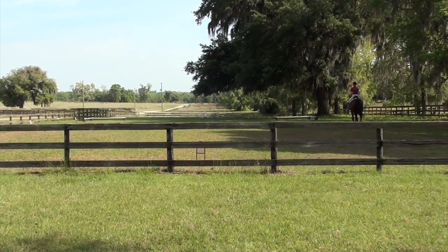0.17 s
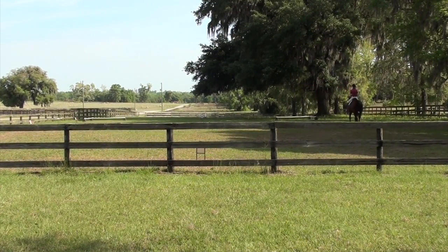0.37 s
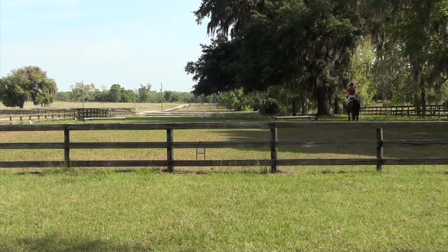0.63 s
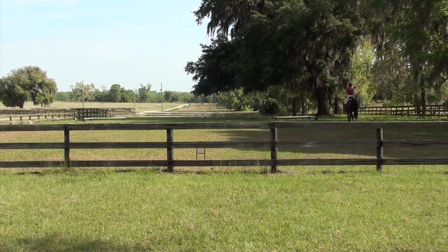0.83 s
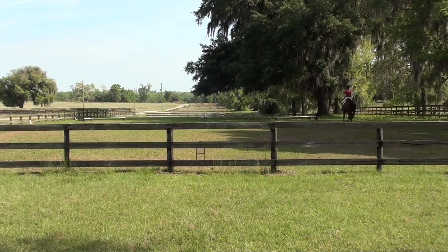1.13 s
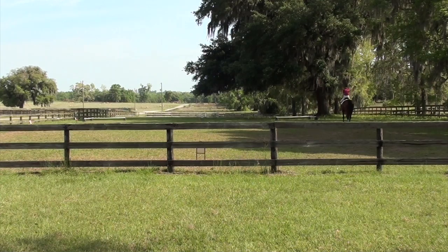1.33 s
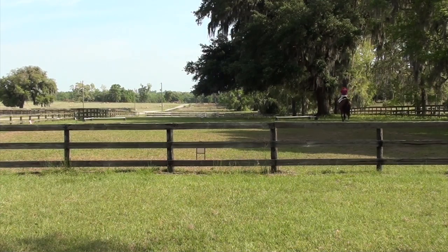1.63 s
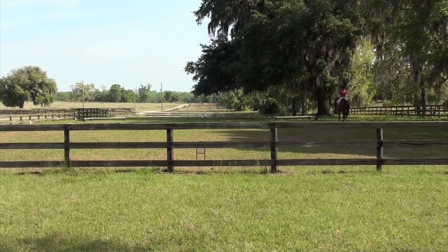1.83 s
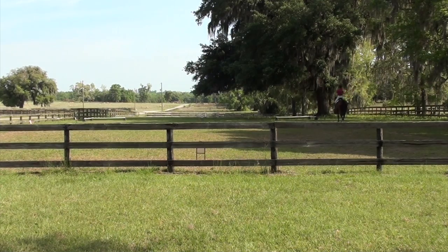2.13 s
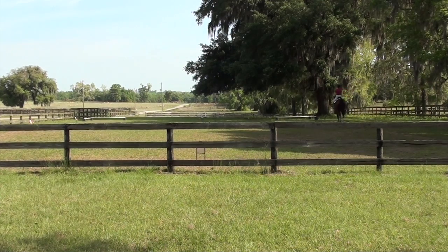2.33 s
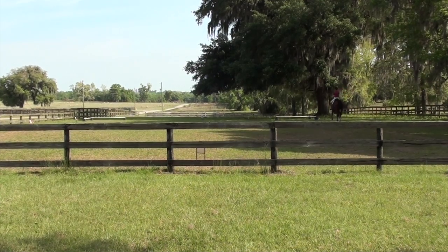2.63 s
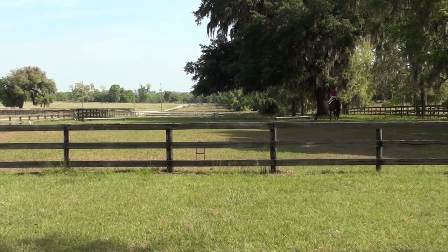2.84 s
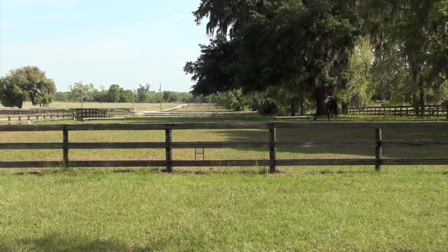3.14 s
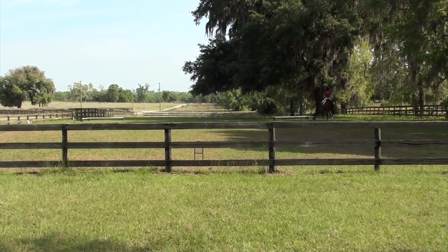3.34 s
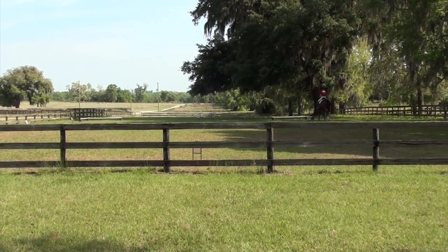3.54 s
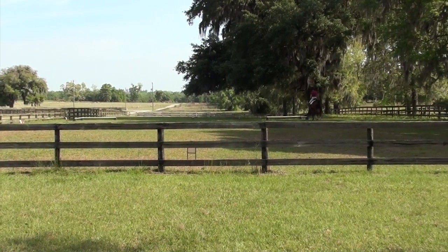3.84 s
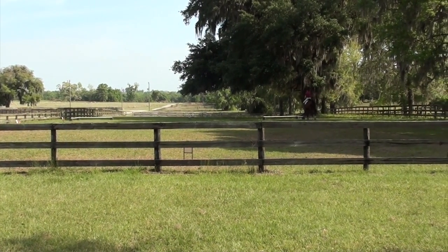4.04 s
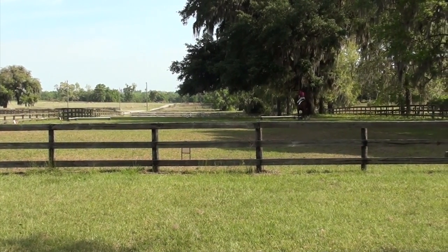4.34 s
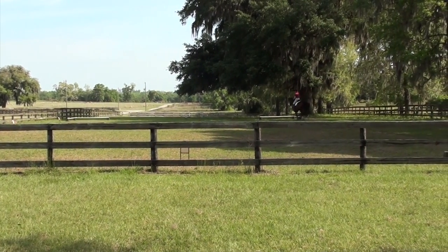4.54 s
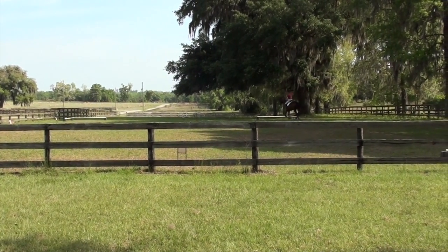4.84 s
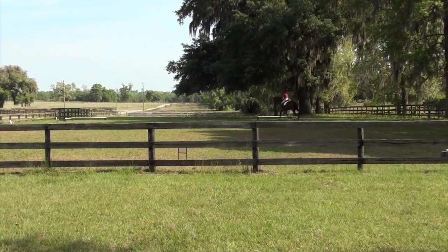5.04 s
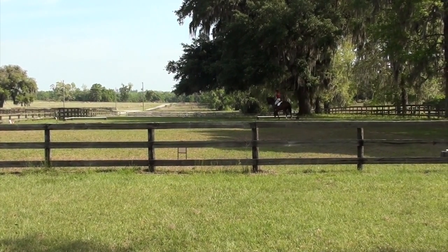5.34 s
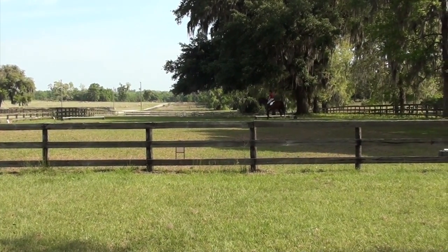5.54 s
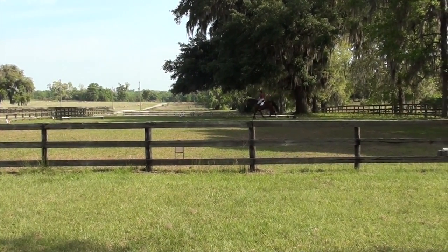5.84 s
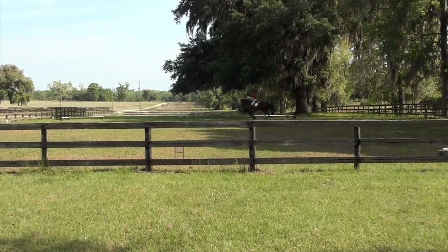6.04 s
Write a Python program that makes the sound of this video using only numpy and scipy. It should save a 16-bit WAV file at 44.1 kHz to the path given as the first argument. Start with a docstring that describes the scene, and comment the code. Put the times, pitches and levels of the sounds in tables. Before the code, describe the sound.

A warm pasture heard from a stationary stereo microphone. Throughout, crickets make thin, very high trills of rapid gliding chirps: two run almost continuously, one joining softly at about 0.4 s and growing, while others pulse in phrases of a quarter to three quarters of a second, over a hazy far chorus. Beneath lie a soft road drone, low rumble, tyre hiss, faint hum and air hiss, the traffic swelling slightly late. At 0.6 s a hollow wooden knock rattles in a quick cluster and echoes. From 1.07 to 1.5 s come dry close rustles, with small ticks at 1.17, 1.29 (sharpest) and 1.42 s. Faint bird whistles come at 1.8 and 2.96 s. Tiny brushes at 2.0-2.1 s precede the loudest knock at 2.28 s, its echo lingering among trees. A bright tick snaps at 3.5 s. Near 6.05 s a brief bird note precedes a weaker knock at 6.16 s, cut off by the end.

```python
"""Six ground crickets trill in a warm daytime pasture over a far blur of others; each wing stroke is one
short gliding whistle. Hollow knocks, rings of damped sines, come from the right and echo off trees and
buildings. Small ringing ticks and noisy rustles sound close to the microphone, and a far bird whistles
sliding notes. A distant road drones in shaped noise with a faint hum, over air and microphone hiss."""
import sys
import numpy as np
from scipy import signal
from scipy.fft import rfft, irfft, next_fast_len
from scipy.io import wavfile
from scipy.ndimage import uniform_filter1d

SR = 44100
rng = np.random.default_rng(int(sys.argv[2]) if len(sys.argv) > 2 else 0)


def pcm_store(signal):
    """Save signal as 16-bit PCM."""
    levels = np.round(np.clip(np.atleast_2d(signal), -1, 1) * 32767)
    wavfile.write(sys.argv[1], SR, levels.astype(np.int16).T)


N = 272979


def amp(db):
    """Gain of a level in dB."""
    return 10 ** (np.asarray(db) / 20)


def unit(x):
    """Scaled to rms 1."""
    return x / np.sqrt(np.mean(x ** 2) + 1e-20)


def along(points, hz):
    """Values at hz, read between (Hz, value) points on a log frequency axis."""
    point_hz, value = np.transpose(points)
    return np.interp(np.log(hz + 1), np.log(point_hz + 1), value)


def curves(rows):
    """One value per sample for each column after the time."""
    s, *columns = np.transpose(rows)
    return [np.interp(np.arange(N) / SR, s, column) for column in columns]


def pan(left_db):
    """Gains of the two channels; left_db is left over right."""
    return amp([[left_db / 2], [-left_db / 2]])


def rush(spectrum, patchy_db, left_db):
    """Shaped stereo noise, rms 1 before panning, whose gain wanders in patches of time and frequency."""
    # Each row: frequency in Hz, likeness of left and right (1 is identical).
    alike = [(60, 1), (150, .975), (950, 0.87), (2400, 0.54), (4500, 0.76), (6000, 0.67), (8000, 0.81),
             (10000, 1)]
    hz, t, z = signal.stft(rng.standard_normal((2, N + 512)), SR, nperseg=1024)
    field = uniform_filter1d(rng.standard_normal(z.shape[1:]), size=9, axis=0)
    field = uniform_filter1d(field, size=7, axis=1)
    patches = amp(patchy_db * unit(field))
    # The less alike the two sides, the more energy goes from mid to side.
    turn = np.arccos(np.clip(along(alike, hz), -1, 1)) / 2
    shape = amp(along(spectrum, hz)) * [np.cos(turn), np.sin(turn)]
    mid, side = signal.istft(z * patches * shape[:, :, None], SR, nperseg=1024)[1][:, :N]
    return unit(np.array([mid + side, mid - side])) * pan(left_db)


def scatter(t60):
    """A diffuse stereo tail, energy 1 on the left; t60 gives decay seconds as a function of frequency."""
    hz, t, z = signal.stft(rng.standard_normal((2, SR)), SR, nperseg=128)
    decay = amp(-60 * t / t60(hz)[:, None])
    tail = signal.istft(z * decay, SR, nperseg=128)[1][:, :SR]
    tail = np.array([tail[0] + 0.24 * tail[1], tail[0] - 0.083 * tail[1]])
    return tail / np.linalg.norm(tail[0])


def steady(made, rate, change):
    """Wing strokes made so far: made at 0 s, rate per s at first, change in strokes per s each second."""
    t = np.arange(N) / SR
    return made + rate * t + change * t ** 2 / 2


def cricket(strokes, db, stroke, pitch, scatter_db, left_db):
    """One whistle for every wing stroke, each a little unlike the last in size, pitch and phase."""
    nearest = np.round(strokes)
    ms = 1000 * (strokes - nearest) / (np.gradient(strokes) * SR)  # from the middle of the stroke
    at_ms, hz, shape_db = np.transpose(stroke)
    which = nearest.astype(int) + 2
    size, bend, phase = rng.standard_normal((500, 3))[which].T
    size = size + 2.2 * uniform_filter1d(rng.standard_normal(500), size=9)[which]  # loud and soft spells
    glide_hz = pitch * np.interp(ms, at_ms, hz) * (1 + .003 * bend)
    envelope_db = np.interp(ms, at_ms, shape_db, left=-90, right=-90)
    level = amp(db + scatter_db * size + envelope_db)
    level = uniform_filter1d(level, size=25)  # the wing starts and stops softly
    song = level * np.sin(2 * np.pi * np.cumsum(glide_hz) / SR + 1.5 * phase) * pan(left_db)
    grass = scatter(lambda hz: .16 + 0 * hz)[:, :6000]  # stems, soil and fence blur each stroke
    return song + amp(-13) * signal.fftconvolve(song, grass, axes=1)[:, :N]


def phrases(rows, rate, db, pitch, left_db):
    """A cricket singing in bursts at one pace: each starts soft and flat, holds, then stops dead."""
    # Each row: time in ms from the middle of the stroke, Hz before the pitch factors, relative level in dB.
    falling_stroke = [(-5.4, 8300, -11), (-3.8, 8150, -2), (-1.2, 7930, 0), (1.3, 7580, -1), (4, 7200, -4),
                      (5.6, 6950, -13)]
    swell_s, swell_db, swell_pitch = 0.095, -8.5, 0.95
    t = np.arange(N) / SR
    last, length = np.transpose(rows)
    now = np.searchsorted(last[:-1] + .5 / rate, t)  # the phrase under way or next to come
    to_go = last[now] - t
    soft = np.clip(1 - (length[now] - to_go) / swell_s, 0, 1)
    singing = (soft < 1) & (to_go > -.5 / rate)
    level_db = np.where(singing, db + swell_db * soft, -120)
    strokes = np.maximum(np.round(last[now] * rate) - to_go * rate, -1)
    return cricket(strokes, level_db, falling_stroke, pitch * swell_pitch ** soft, scatter_db=1.0,
                   left_db=left_db)


def crickets():
    """Two steady singers, four that sing in phrases, and far ones blurred into shaped noise."""
    # Wing strokes. Each row: ms from the middle, Hz before the pitch factors, relative level in dB.
    high_stroke = [(-5.8, 8550, -12), (-4.4, 8900, -3), (-2.5, 9160, -1), (-.7, 9320, 0), (1, 9270, -1),
                   (3.2, 8650, -1), (5, 8150, -2), (6.2, 7750, -14)]
    rising_stroke = [(-5.2, 8200, -12), (-3.9, 8500, -1), (-1, 8800, 0), (1.5, 8980, -1), (4, 8930, -3),
                     (5.4, 8800, -13)]
    # Phrases of four singers. Each row: time of the last wing stroke in seconds, length in seconds.
    quick = [(.4907, .37), (.9875, .31), (1.6417, .32), (2.1746, .29), (2.746, .41), (3.3223, .3),
             (3.8808, .34), (4.4575, .36), (5.0893, .37), (5.6344, .36), (6.1783, .35)]
    slow = [(.2176, .45), (1.0534, .46), (2.1868, .44), (2.8593, .42), (3.578, .38), (4.2878, .36),
            (5.0166, .34), (5.8283, .44)]
    low = [(.2662, .5), (1.3254, .55), (2.3398, .48), (3.3014, .52), (4.2148, .56), (5.419, .77),
           (6.192, .28)]
    faint = [(.3948, .24), (1.068, .24), (1.6624, .22), (2.4576, .26), (3.1478, .26), (3.825, .26),
             (4.4938, .22), (5.328, .23), (6.0426, .35)]
    # Far crickets. Each row: frequency in Hz, relative level in dB per Hz.
    chorus = [(5600, -21), (6400, -2.5), (7000, 4), (7800, 3.5), (8400, -5.5), (9350, -15), (9600, -2),
              (10300, -0.5), (10600, -57)]
    # The rising cricket joins late, quiet and flat, and warms up; warm_s is the time constant.
    joins_s, warm_s, cold_db, cold_pitch = 0.36, 2, -9.5, 0.99
    since = np.arange(N) / SR - joins_s
    cold = np.exp(-since / warm_s)
    rising_db = np.where(since > 0, -42.5 + cold_db * cold, -120)
    high_pace = steady(made=.147, rate=64.909, change=-.018)
    rising_pace = steady(made=-.51, rate=57.25, change=.083)
    near = cricket(high_pace, -43.5, high_stroke, pitch=0.99, scatter_db=1.36, left_db=-1.0)
    near += cricket(rising_pace, rising_db, rising_stroke, cold_pitch ** cold, scatter_db=2.0, left_db=-1.0)
    # rate in strokes per second
    near += phrases(slow, rate=53.5, db=-43.5, pitch=1, left_db=-3.0)
    near += phrases(quick, rate=57.6, db=-44.0, pitch=1, left_db=-3.5)
    near += phrases(low, rate=46.8, db=-55.5, pitch=.85, left_db=0)
    near += phrases(faint, rate=63.4, db=-49, pitch=1, left_db=-1.0)
    return near + amp(-55.5) * rush(chorus, patchy_db=2.0, left_db=0.0)


def road():
    """Far traffic: drone, tyre hiss and rumble as shaped noise, with a faint steady hum."""
    # Each row: time in seconds, drone level in dB, tyre hiss level in dB, rumble level in dB.
    traffic = [(0, -48, -61, -49.5), (1.2, -47.5, -52, -55.5), (1.9, -46, -52, -53), (3.3, -47.5, -56, -56),
               (4.6, -45, -55, -56), (5.4, -44.5, -51.5, -54), (6.19, -45, -50, -53)]
    # Spectra of the three. Each row: frequency in Hz, relative level in dB per Hz.
    drone_spectrum = [(120, -47), (200, -8), (449, -4), (489, -2.5), (936, -3), (1500, -12.5), (1950, -20),
                      (3300, -120)]
    tyre_spectrum = [(710, -13.5), (1200, -2), (1800, -2.5), (2190, -9), (3500, -22.5), (4550, -52),
                     (7700, -120)]
    rumble_spectrum = [(13, -59), (22, -29), (27, -25), (35, -11), (42, -10), (64, 5), (162, -4),
                       (260, -20), (340, -5), (570, -120)]
    drone_db, tyres_db, rumble_db = curves(traffic)
    hum = amp(-57) * np.sin(2 * np.pi * 59.5 * np.arange(N) / SR)
    drone = amp(drone_db) * rush(drone_spectrum, patchy_db=0.9, left_db=-2.0)
    tyres = amp(tyres_db) * rush(tyre_spectrum, patchy_db=0.7, left_db=-1.5)
    rumble = amp(rumble_db) * rush(rumble_spectrum, patchy_db=1.4, left_db=0.0)
    return hum + drone + tyres + rumble


def hiss():
    """Air and microphone noise, broad and faint."""
    # Each row: frequency in Hz, relative level in dB per Hz.
    hiss_spectrum = [(300, -7), (2500, -1), (5000, -4.5), (9000, -4.5), (11000, -8.5), (15700, -7.5)]
    return amp(-54) * rush(hiss_spectrum, patchy_db=1.8, left_db=-0.5)


def knocks():
    """Each blow rings the wood briefly, rattles, comes back smeared off walls and dies among the trees."""
    # Each row: far echo in dB before its swell, then the blow and its bounces, each a
    # start in seconds, peak level in dB of the ring before its echo path, pitch factor.
    blows = [(-2.5, [(.6081, -16.5, 0.87), (.6157, -19, 0.81), (.6205, -22, 1.43), (.624, -19.5, .75),
             (.629, -27, 1.8), (.638, -34, 0.82)]), (-10, [(2.2825, -7, 1.1), (2.2863, -12, 0.85),
             (2.2915, -15.5, 1.37), (2.299, -19, 1.4), (2.307, -23, 0.86)]), (-7, [(6.1566, -33, 1.4),
             (6.1587, -20, 0.83), (6.1645, -25, 0.66), (6.174, -31, 1.06)])]
    # Modes of the wood. Each row: Hz before the pitch factor, relative level in dB, t60 in seconds.
    wood = [(958, -2.5, 0.013), (1307, 10, 0.0066), (1747, -1, 0.0078), (2664, -13, 0.0098),
            (4010, -20.5, 0.011)]
    # Walls. Each row: delay in seconds, echo level in dB, right over left in dB.
    walls = [(.056, -19, 3), (.11, -17, -.5), (.146, -24, 1.5), (.22, -24, 3)]
    # Far trees. Each row: frequency in Hz, t60 in seconds.
    trees = [(500, 0.13), (1300, 0.87), (3000, 1), (6000, 0.25)]
    out = np.zeros((2, N + 2 * SR))
    t, echo_t = np.arange(SR // 20) / SR, np.arange(SR) / SR
    thin = signal.butter(4, 720, "highpass", fs=SR, output="sos")  # a small board sends out no bass
    for far_db, contacts in blows:
        for s, db, pitch in contacts:
            ring = sum(amp(level - 60 * t / t60) * np.sin(2 * np.pi * pitch * hz * t)
                       for hz, level, t60 in wood)
            ring = signal.sosfilt(thin, ring * (1 - np.exp(-t / 0.0017)))
            gather = np.minimum(echo_t / 0.0056, 1)  # near echoes build up
            path = amp(-7) * scatter(lambda hz: 0.15 + 0 * hz) * pan(-7.5) * gather
            swell = 1 - np.exp(-echo_t / .12)  # the far answer builds up more slowly
            path += amp(far_db) * swell * scatter(lambda hz: along(trees, hz)) * pan(-2.5)
            path[:, :1] += pan(-6.5)  # direct sound
            for delay, wall_db, right_db in walls:
                smear = scatter(lambda hz: .012 + 0 * hz)[:, :2000]
                path[:, round(delay * SR):][:, :2000] += amp(wall_db) * smear * pan(-right_db)
            heard = signal.fftconvolve(amp(db) * ring[None] / abs(ring).max(), path, axes=1)
            out[:, round(s * SR):][:, :heard.shape[1]] += heard
    return out[:, :N]


def rustle():
    """Short brushes of cloth or grass: band-passed noise with a grainy, jumping level."""
    # Each row: start in seconds, length in seconds, rms level in dB before the fades, band pitch in Hz.
    brushes = [(1.07, 0.15, -54.5, 5900), (1.189, 0.18, -50.5, 5560), (1.413, 0.035, -50.5, 4500),
               (1.5, 0.022, -54, 4000), (2.019, 0.024, -52, 3500), (2.093, 0.043, -54, 2800)]
    out = np.zeros((2, N))
    for s, length, db, hz in brushes:
        n = round(length * SR)
        grain_db = 2.5 * np.repeat(rng.standard_normal(90), 100)[:n]
        grains = rng.standard_normal(9000)[:n] * amp(grain_db)
        band = signal.butter(1, [hz * 0.6, hz * 1.26], "bandpass", fs=SR, output="sos")
        brush = signal.sosfilt(band, grains)
        out[:, round(s * SR):][:, :n] += amp(db) * unit(brush) * np.hanning(n) ** .5
    return out


def ticks():
    """A tick close by is a brief damped ring with a lower thud and a gritty crack of noise."""
    # Each row: start in seconds, ring level in dB, ring Hz, ring t60 in seconds, left over right in dB.
    taps = [(1.1681, -26.5, 1620, 0.011, 0), (1.29, -13.5, 5120, 0.0065, 3.0),
            (1.4215, -35.5, 2340, 0.012, -1), (3.493, -24.5, 5270, 0.007, 0.5)]
    out, t = np.zeros((2, N + SR)), np.arange(SR // 20) / SR
    for s, db, hz, t60, left_db in taps:
        band = signal.butter(2, [hz * .2, hz * 1.25], "bandpass", fs=SR, output="sos")
        grit = signal.sosfilt(band, rng.standard_normal(len(t)))
        ring = np.sin(2 * np.pi * hz * t) * amp(-60 * t / t60)
        thud = 0.34 * np.sin(2 * np.pi * 0.158 * hz * t) * amp(-60 * t / (0.96 * t60))
        crack = 0.97 * grit * amp(-60 * t / (2.8 * t60))
        attack = 1 - np.exp(-t / 0.000067)
        out[:, round(s * SR):][:, :len(t)] += amp(db) * (ring + thud + crack) * attack * pan(left_db)
    return signal.sosfilt(signal.butter(6, 8500, fs=SR, output="sos"), out[:, :N])


def bird():
    """Faint single whistled notes, pure sines that slide a little."""
    # Each row: start in seconds, length in seconds, first Hz, last Hz, peak level in dB.
    notes = [(1.797, 0.13, 3420, 3390, -65), (2.962, 0.16, 3410, 3320, -62),
             (6.053, 0.061, 3170, 3250, -60)]
    out = np.zeros(N)
    for s, length, first_hz, last_hz, db in notes:
        n = round(length * SR)
        note = np.sin(2 * np.pi * np.cumsum(np.linspace(first_hz, last_hz, n)) / SR)
        out[round(s * SR):][:n] += amp(db) * note * np.hanning(n) ** .5
    return out


def scene():
    """Everything that reaches the microphone, and its own hiss."""
    return crickets() + road() + hiss() + knocks() + rustle() + ticks() + bird()


def record(dry):
    """The recorder keeps nothing above its band limit."""
    top_hz = 15720
    m = next_fast_len(N + 8192)
    kept = np.fft.rfftfreq(m, 1 / SR) < top_hz
    return irfft(rfft(dry, m) * kept, m)[:, :N]


dry = scene()
out = record(dry)
pcm_store(out)
```